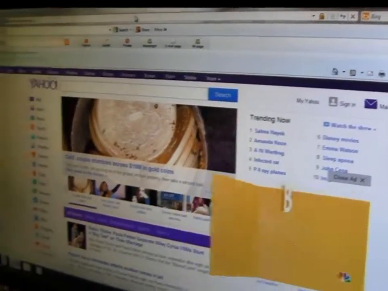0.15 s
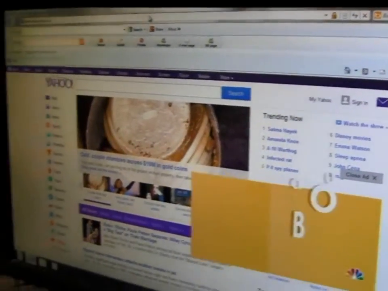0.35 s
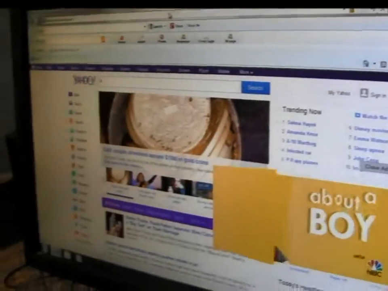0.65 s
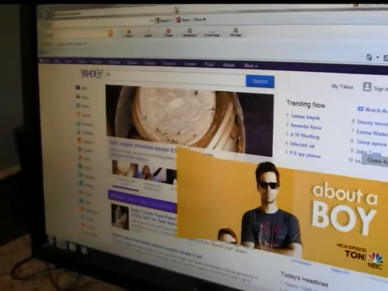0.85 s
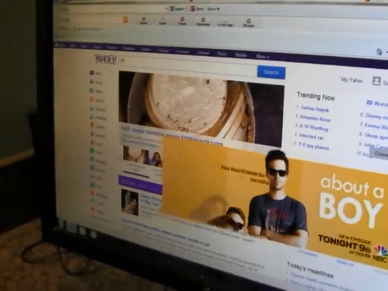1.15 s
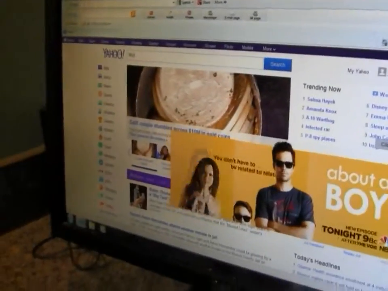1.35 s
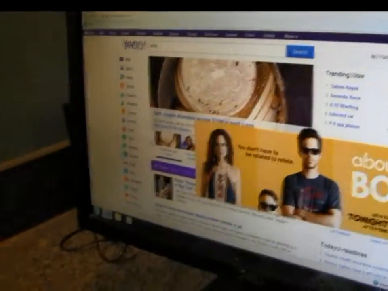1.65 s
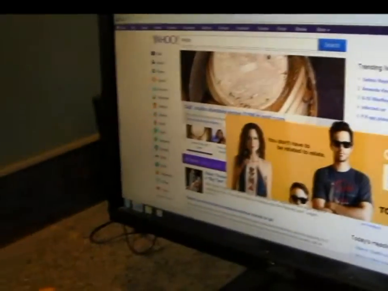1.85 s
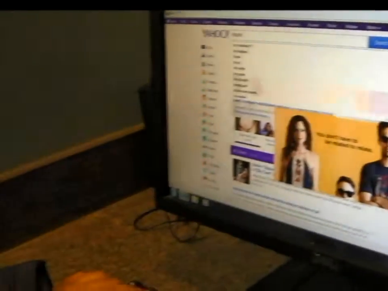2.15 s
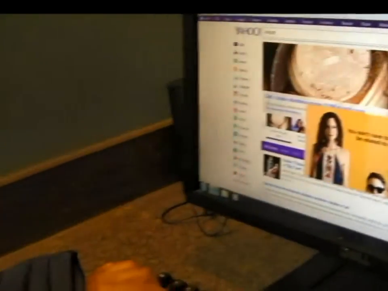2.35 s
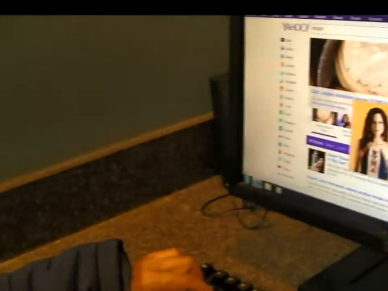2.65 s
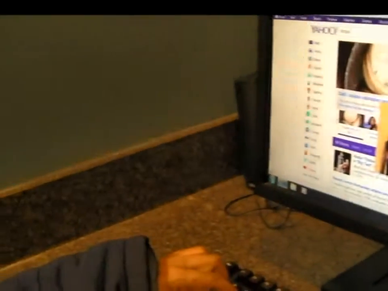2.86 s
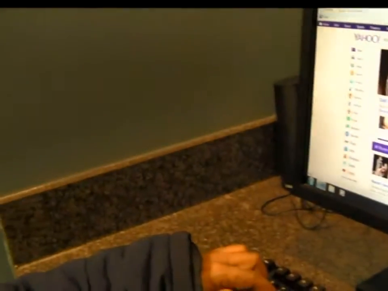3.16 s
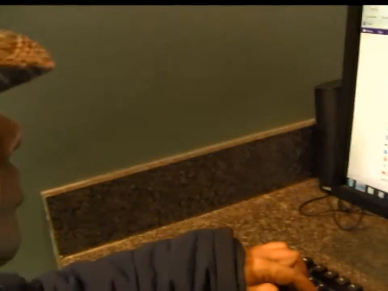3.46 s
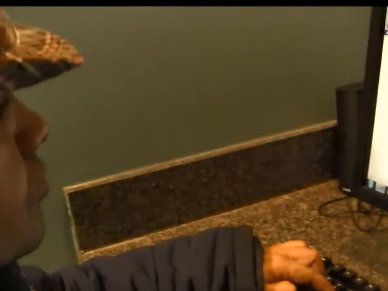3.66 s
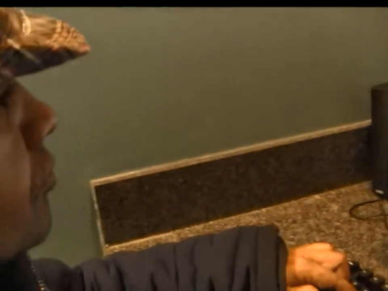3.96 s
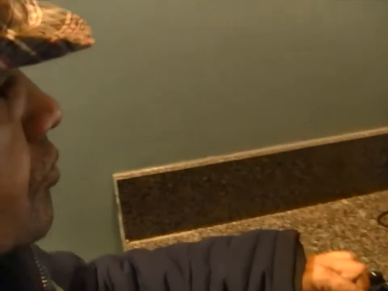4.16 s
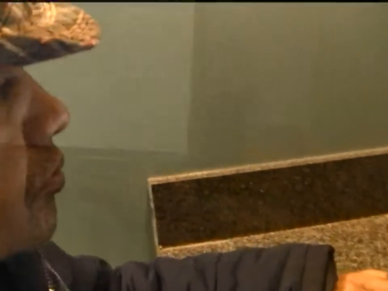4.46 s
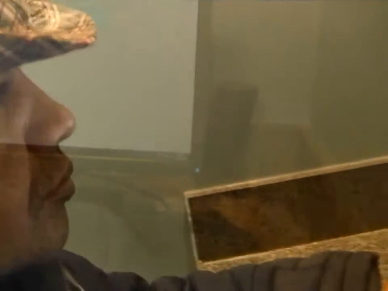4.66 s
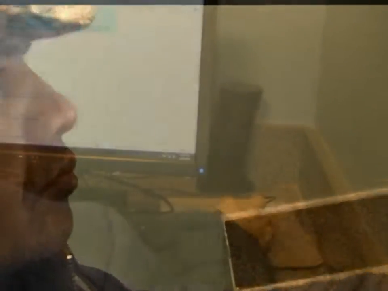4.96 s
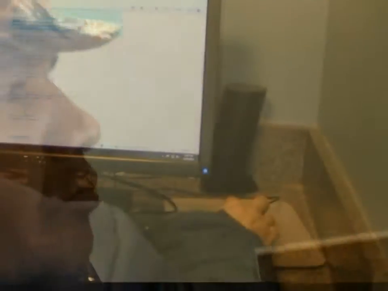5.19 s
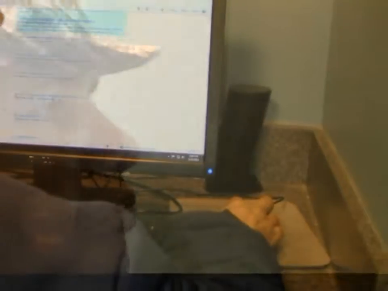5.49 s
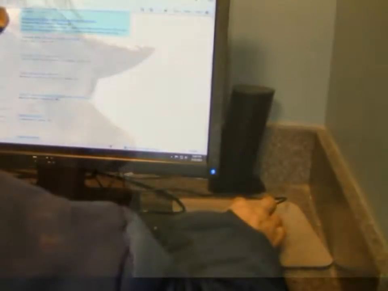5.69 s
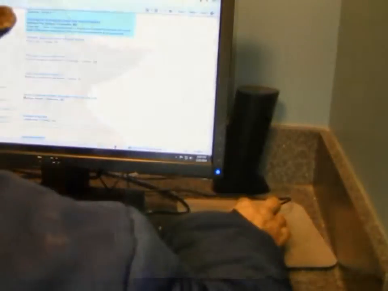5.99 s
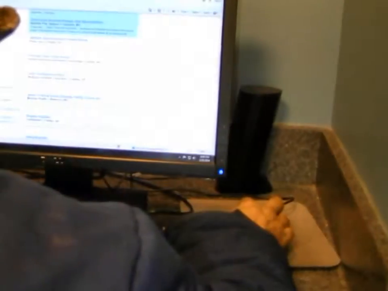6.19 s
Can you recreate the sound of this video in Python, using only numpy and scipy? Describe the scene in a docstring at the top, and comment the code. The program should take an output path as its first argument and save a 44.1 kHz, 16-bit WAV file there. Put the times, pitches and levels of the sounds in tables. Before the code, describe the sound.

Fingers clatter on computer keys in a small humming room, stop, strike again briefly, then cloth brushes the desk and a mouse clicks.

```python
"""Typing on a stone desk

Fingers type in short bursts on a plastic keyboard, close to a stereo camera. Each key contact is a
slide, a blow and a rattle of tiny ticks that ring cap, case and stem; some set off a fizzing wire or
a desk boom. A mouse clicks dry on the left. A sleeve brushes the desk as shaped cloth noise. Fans
hum low as wavering tones in patchy air noise; the typing alone gets sparse echoes of a small room."""
import sys
import numpy as np
from scipy import signal
from scipy.fft import rfft, irfft
from scipy.io import wavfile
from scipy.ndimage import uniform_filter1d

SR = 44100
rng = np.random.default_rng(int(sys.argv[2]) if len(sys.argv) > 2 else 0)


def pcm_store(signal):
    """Save signal as 16-bit PCM."""
    levels = np.round(np.clip(np.atleast_2d(signal), -1, 1) * 32767)
    wavfile.write(sys.argv[1], SR, levels.astype(np.int16).T)


N = 279153  # length in samples


def amp(db):
    """Turns decibels into an amplitude factor."""
    return 10 ** (np.asarray(db) / 20)


def evened(x):
    """Scales a signal to rms 1."""
    return x / np.sqrt(np.mean(np.abs(x) ** 2) + 1e-20)


def read(points, hz):
    """Reads a curve of (hz, value) points, straight over log frequency."""
    f, value = np.transpose(points)
    return np.interp(np.log(hz + 1), np.log(f + 1), value)


def grid(size):
    """Frame times and bin frequencies of a short-time spectrum."""
    times = np.arange(4 * N // size + 5) * size / 4 / SR
    return times, np.fft.rfftfreq(size, 1 / SR)[:, None]


def noise(gain, likeness, size):
    """Two partly alike channels of noise under a bins x frames gain; gain 1 is rms 1 over all bins."""
    a, b, c, d = rng.standard_normal((gain.shape[1], gain.shape[0], 4)).T
    same = np.clip(read(likeness, grid(size)[1]), -1, 1)
    left = a + 1j * b
    right = same * left + np.sqrt(1 - same ** 2) * (c + 1j * d)
    spectrum = np.array([left, right]) * gain
    return signal.istft(spectrum, nperseg=size, noverlap=3 * size // 4)[1][:, :N] / np.sqrt(size / 3)


def band_gain(shape_db, hz, lo_hz, hi_hz):
    """Scales a spectrum so that the band lo to hi has rms 1."""
    gain = amp(shape_db)
    in_band = (hz > lo_hz) * (hz < hi_hz)
    return gain / np.sqrt(np.mean(gain ** 2 * in_band, axis=0))


# fan and mains tones: pitch_hz, width_hz, level_db (wavering part, relative to the room level)
FAN_TONES = [(62.7, 28, -20.5), (124.6, 1.1, -13), (186.7, 8.8, -15.5), (223.8, 26, -6), (266.5, 14, -10),
             (537.7, 9.7, -12.5), (642, 8.3, -18)]


def hum():
    """Fan and mains lines: tones that waver in level and phase, partly steady."""
    hz, out = np.fft.rfftfreq(N, 1 / SR), 0
    for pitch_hz, width_hz, db in FAN_TONES:
        a, b = rng.standard_normal((len(hz), 2)).T
        resonance = 1 + (2 * (hz - pitch_hz) / width_hz) ** 2
        waver = irfft((a + 1j * b) / resonance, N)
        steady = np.sqrt(2) * np.sin(2 * np.pi * (pitch_hz * np.arange(N) / SR + rng.random()))
        out = out + amp(db) * (evened(waver) + 0.47 * steady)
    return out


# room noise drift: time_s, level_db, upper_edge_level_db, bass_gain_db (below BASS_HZ)
ROOM_DRIFT = [(0.0, -57.5, -70, -4), (1.02, -58.5, -67, 1.5), (1.46, -55.5, -72.5, -0.5),
              (1.849, -55, -64, -5), (2.43, -54.5, -74.5, 1.5), (2.751, -55, -71, 2.5), (3.0, -58, -88, 1),
              (3.55, -57.5, -83, -3), (3.7, -56.5, -76, 2), (4.34, -55, -69.5, 3), (4.87, -59.5, -62, 1),
              (5.55, -64, -85.5, -4), (5.9, -61.5, -78.5, -4), (6.33, -57.5, -71.5, -7.5)]
# tone of the air noise: pitch_hz, density_db (per Hz)
AIR_TONE = [(12, -54.5), (20, -25.5), (59, -25.5), (87, -26.5), (108, -11.5), (262, -2), (386, -5),
            (523, -5), (570, -11.5), (692, -8.5), (1140, -25.5), (1510, -30.5), (3500, -83), (4550, -101),
            (7700, -120)]
# left-right likeness of the air noise: pitch_hz, likeness (1 = identical)
AIR_LIKENESS = [(60, 0.93), (130, 0.87), (290, 0.54), (640, 0.25), (1400, 0.1123), (4000, 0.17)]
BASS_HZ = 150


def room():
    """Fan noise in drifting patches under the hum; its upper edge and its bass come and go."""
    time_s, level_db, edge_db, bass_db = np.transpose(ROOM_DRIFT)
    t, hz = grid(2048)
    low = band_gain(read(AIR_TONE, hz), hz, 100, 700) * amp(np.interp(t, time_s, level_db))
    edge_shape_db = -11.0 * np.log2(hz / 1000 + 1e-3) ** 2 - 3.4 * hz / 1000
    edge = band_gain(edge_shape_db, hz, 650, 2700) * amp(np.interp(t, time_s, edge_db))
    low_share = 1 / (1 + (hz / 850) ** 8)

    patches = rng.standard_normal((len(t), len(hz))).T
    patches = uniform_filter1d(patches, size=5, axis=0)
    patches = evened(uniform_filter1d(patches, size=8, axis=1))
    patchy_db = 2.4 * low_share + 3.3 * (1 - low_share)
    gain = np.sqrt(low_share * low ** 2 + (1 - low_share) * edge ** 2)
    air = noise(gain * amp(patchy_db * patches), AIR_LIKENESS, 2048)

    now = np.arange(N) / SR
    both = air + hum() * amp(np.interp(now, time_s, level_db))
    bass = signal.sosfiltfilt(signal.butter(3, BASS_HZ, fs=SR, output="sos"), both)
    return both + bass * (amp(np.interp(now, time_s, bass_db)) - 1)


# sleeve strokes: full_speed_from_s, hold_s, brush_db, rise_db_per_s, fall_db_per_s,
# treble_tilt_db_per_octave (well above 3 kHz), rumble_db
STROKES = [(.44, 0.052, -67, 497, 402, -20.5, -75), (2.741, 0.083, -54, 119.5, 204, -8, -60.5),
           (4.82, 0.036, -76.5, 73, 195, 2, -62.5), (4.938, .09, -45.5, 261, 90, 2.5, -56.5),
           (5.09, .1, -47, 90.5, 135.5, 4, -55), (5.108, 0.028, -43.5, 1195, 644, -4.5, -41),
           (5.36, 0.11, -72, 200.5, 256, -19.5, -68.5)]
# cloth hiss before the tilt: pitch_hz, density_db (per Hz)
CLOTH_TONE = [(410, -21), (700, -2.5), (872, -9), (1410, 0), (1630, -1.5), (1760, 3), (3450, -4.5),
              (5080, -4), (14100, -20), (15500, -23.5)]
# desk rumble under the sleeve: pitch_hz, density_db (per Hz)
RUMBLE_TONE = [(40, -37.5), (100, 1), (250, 14.5), (500, 8.5), (1000, 3.5), (1600, -17.5), (3000, -46)]
# left-right likeness of the sleeve: pitch_hz, likeness (1 = identical)
SLEEVE_LIKENESS = [(60, 0.94), (240, 0.85), (950, 0.79), (3770, 0.53), (15000, 0.041)]
DULLING = 0.55  # tilt lost per dB below full speed (dB/octave)
RUMBLE_FOLLOWS = 0.34  # share of the brush's rise and fall, in dB, that the rumble makes


def sleeve():
    """Cloth hiss, brighter in a fast stroke, flickering with the weave, over a rumble in the desk."""
    t, hz = grid(256)
    slow_t, low_hz = grid(512)
    weave = rng.standard_normal((len(t), len(hz))).T
    overall = evened(uniform_filter1d(rng.standard_normal(len(t)), size=5))
    by_band = evened(uniform_filter1d(weave, size=9, axis=0))
    flicker_db = 1.2 * overall + 0.84 * by_band

    brush_power = rumble_power = 0
    for s, hold, brush_db, rise, fall, tilt_db, rumble_db in STROKES:
        below_db = rise * np.maximum(s - t, 0) + fall * np.maximum(t - s - hold, 0)
        slope_db = np.clip(tilt_db - DULLING * below_db, -40, 10) * np.log2(1 + hz / 3000)
        cloth = band_gain(read(CLOTH_TONE, hz) + slope_db, hz, 1500, 6000)
        brush_power = brush_power + (cloth * amp(brush_db - below_db)) ** 2
        slow_below_db = np.interp(slow_t, t, below_db)
        rumble_power = rumble_power + amp(rumble_db - RUMBLE_FOLLOWS * slow_below_db) ** 2

    brush = np.sqrt(brush_power) * amp(flicker_db)
    rumble = band_gain(read(RUMBLE_TONE, low_hz), low_hz, 100, 1200) * np.sqrt(rumble_power)
    both = noise(brush, SLEEVE_LIKENESS, 256) + noise(rumble, SLEEVE_LIKENESS, 512)
    return both * amp([[-.8], [.8]])  # a little to the right


# heavy blows that boom in the desk top: start_s, level_db
DESK_BLOWS = [(0.688, -45.5), (1.182, -58), (1.547, -49), (3.246, -37.5), (4.43, -50.5), (5.123, -36.5)]
# desk top modes: pitch_hz, level_db (relative to the blow, before the swell), t60_s
DESK_MODES = [(63.5, -5, .2), (129, 1, 0.29)]
DESK_SWELL_S = 0.061  # time constant


def thumps():
    """Low desk modes that swell over tens of ms and die."""
    t, out = np.arange(N) / SR, 0
    for s, db in DESK_BLOWS:
        age = np.maximum(t - s, 0)
        modes = 0
        for pitch_hz, mode_db, t60 in DESK_MODES:
            modes = modes + amp(mode_db - 60 * age / t60) * np.sin(2 * np.pi * pitch_hz * age)
        out = out + amp(db) * (1 - np.exp(-age / DESK_SWELL_S)) * modes
    return out


# decay of the room echo: pitch_hz, t60_s
WALL_DECAY = [(250, 0.23), (1000, 0.18), (4000, 0.17), (12000, .15)]
WALLS_DB = -4.5


def walls(x):
    """Sparse echoes of random sign, each band dying at its own speed."""
    signs = rng.choice([-1., 1.], (2, SR // 2))
    taps = signs * (rng.random((2, SR // 2)) < .06)
    taps[:, :200] = 0  # a gap before the first echo
    taps[1] = 0.49 * taps[0] + 0.76 * taps[1]  # close microphones share much of the echo
    hz, t, z = signal.stft(taps, SR, nperseg=256)
    decay = amp(-60 * t / read(WALL_DECAY, hz)[:, None])
    tail = signal.istft(z * decay, SR, nperseg=256)[1]
    tail = tail / np.linalg.norm(tail[0])
    return amp(WALLS_DB) * signal.fftconvolve(x.mean(0)[None], tail, axes=1)[:, :N]


def ring(modes, centre_hz):
    """Causal response of well damped plastic modes whose powers add; those near a centre sound most."""
    f = np.fft.fftfreq(2048, 1 / SR)
    hz, width, db = np.transpose(modes)[:, :, None]
    width = np.maximum(width, .22 * hz)  # keeps every mode well damped
    luck_db = 1.5 * rng.standard_normal((len(modes), 1))
    near_db = -12 * abs(np.log2(hz / centre_hz))
    resonance = 1 + ((f ** 2 - hz ** 2) / (width * abs(f) + 1)) ** 2
    peaks = amp(db + luck_db + near_db) / resonance
    peaks = peaks / (1 + (f / (1.6 * hz.max())) ** 6)  # a soft contact cannot drive far above its modes
    log_gain = np.log((peaks ** 2).sum(0) + 1e-10) / 2
    minimum_phase = -signal.hilbert(log_gain).imag
    return np.fft.ifft(np.exp(log_gain + 1j * minimum_phase)).real[:1024]


# what the case, keycap, stem and spring ring with, each: pitch_hz, width_hz (ring may widen it), level_db
CASE_MODES = [(396, 67, 3), (529.5, 67, 2.5), (660, 370, 3), (924, 270, -7.5), (1138, 560, 5),
              (1510, 320, 3.5)]
CAP_MODES = [(2090, 770, 1.5), (2702, 170, -11), (2920, 1600, 1), (3640, 680, 0.5), (4020, 460, -3.5)]
STEM_MODES = [(5170, 3700, -10.5), (6060, 570, -9), (6850, 660, -6)]
SPRING_MODES = [(9590, 2000, 3.5), (10900, 5000, -20), (13600, 2000, -14)]
LEAD_S = .012  # time kept free before a blow


def contact(cap_db, case_db, stem_db, spring_db, cap_hz, case_hz, t60, rise_s, spring_hz=10000):
    """The part slides for the rise time, lands with a blow about as long, then rattles in small ticks."""
    t = np.arange(8192) / SR - LEAD_S
    a, b, size_db = rng.standard_normal((len(t), 3)).T
    slide = np.clip(1 + t / rise_s, 0, 1) ** 2
    blow = np.exp(-abs(t) / (0.62 * rise_s))
    rattle = 0.52 * amp(-60 * np.maximum(t, 0) / max(t60, .01))
    shape = amp(size_db) * slide * (blow + rattle)
    # peak level, modes, strongest pitch, left-right likeness
    parts = [(cap_db, CAP_MODES, cap_hz, .85), (case_db, CASE_MODES, case_hz, .97),
             (stem_db, STEM_MODES, 6500, .55), (spring_db, SPRING_MODES, spring_hz, .4)]
    sound = 0
    for k, (db, modes, centre_hz, same) in enumerate(parts):
        pair = [a, same * a + np.sqrt(1 - same ** 2) * b]
        ticks = np.roll(pair, 999 * k, axis=1) * shape  # each part gets its own ticks
        burst = signal.fftconvolve(ticks, ring(modes, centre_hz)[None], axes=1)
        sound = sound + amp(db) * burst / abs(burst).max()
    return sound


def clicks(table, rise_s):
    """Every contact of a table as (time, sound); the spring stays quiet."""
    return [(s, contact(cap, case, stem, -np.inf, *rest, rise_s)) for s, cap, case, stem, *rest in table]


def place(timed_sounds, pan_db):
    """Sums (time, sound) pairs, each at its place between the microphones; positive pan is left."""
    out = np.zeros((2, N + SR))
    for s, sound in timed_sounds:
        at = round((s - LEAD_S) * SR)
        out[:, at:at + sound.shape[1]] += sound * amp([[pan_db(s) / 2], [-pan_db(s) / 2]])
    return out[:, :N]


# mouse clicks and ticks: start_s, clack_peak_db, thock_peak_db, tick_peak_db,
# strongest_clack_hz, strongest_thock_hz, rattle_t60_s
MOUSE_CLICKS = [(5.353, -61, -51, -86, 2460, 1260, 0.026), (5.428, -57.5, -39.5, -90, 2050, 920, 0.059),
                (5.705, -46.5, -30.5, -44.5, 2500, 866, 0.035), (6.052, -79, -54, -67, 2100, 726, .2),
                (6.294, -74.5, -59.5, -57.5, 4120, 744, 0.26)]
MOUSE_RISE_S, MOUSE_PAN_DB = 0.0011, 11


def mouse():
    """Small dry contacts on the left, with a shorter slide than the keys and the same plastic modes."""
    return place(clicks(MOUSE_CLICKS, MOUSE_RISE_S), lambda s: MOUSE_PAN_DB)


KEY_RISE_S = 0.0046  # slide before the blow
# fizz of the wire under a long key: start_s, fizz_peak_db, strongest_hz
WIRE_FIZZES = [(0.683, -47.5, 13600), (0.7099, -49, 13600), (1.1805, -62, 13600), (2.0078, -61, 10000),
               (3.2379, -50.5, 10500), (4.4195, -35.5, 9300), (4.4417, -43.5, 9300), (6.293, -65, 13600)]
WIRE_T60_S = 0.048


def wires():
    """Contacts in which only the spring steel sounds."""
    fizzes = []
    for s, db, hz in WIRE_FIZZES:
        cap_hz, case_hz = CAP_MODES[0][0], CASE_MODES[0][0]  # both silent here
        fizz = contact(-np.inf, -np.inf, -np.inf, db, cap_hz, case_hz, WIRE_T60_S, KEY_RISE_S, hz)
        fizzes.append((s, fizz))
    return fizzes


# key contacts: start_s, keycap_clack_peak_db, case_thock_peak_db, stem_tick_peak_db,
# strongest_clack_hz, strongest_thock_hz, rattle_t60_s
KEY_CONTACTS = [(0.2217, -47.5, -41, -56, 1940, 540, 0.05), (0.4931, -35, -34, -44.5, 3430, 1000, 0.036),
                (0.684, -29.5, -30.5, -34, 2050, 1570, 0.06), (0.6957, -27, -39, -32, 2870, 1290, 0.07),
                (0.7099, -35.5, -35, -38.5, 1900, 660, 0.24), (0.8493, -36, -35, -40, 1920, 644, 0.11),
                (0.9353, -29.5, -26.5, -36.5, 3020, 1070, 0.018),
                (0.9662, -39.5, -35.5, -58, 2040, 1030, 0.015), (1.111, -73.5, -47, -92, 2220, 977, .074),
                (1.1808, -25, -32, -32.5, 3100, 600, 0.17), (1.21, -46, -40, -59, 2670, 514, 0.034),
                (1.297, -48.5, -58, -77, 2030, 506, 0.05), (1.3148, -51, -48, -81, 3070, 512, 0.039),
                (1.3417, -81, -58.5, -63, 3450, 533, .071), (1.5459, -31.5, -32, -31.5, 3670, 715, .17),
                (1.6419, -41.5, -56, -55, 1980, 546, .064), (1.658, -38, -36.5, -47.5, 3300, 640, 0.068),
                (1.752, -31, -37, -38.5, 3730, 675, 0.1), (1.8577, -46, -77, -56, 2090, 514, 0.025),
                (1.8779, -33.5, -41.5, -45.5, 3600, 566, 0.056),
                (1.9665, -29.5, -25, -39, 3070, 1000, 0.022), (2.0078, -38, -42, -53, 2030, 1460, 0.026),
                (2.1435, -36.5, -46, -51, 3200, 1200, 0.078), (2.1614, -45.5, -38.5, -69, 2340, 1050, 0.11),
                (2.1775, -39, -33.5, -44.5, 2880, 1040, 0.027),
                (2.2343, -50.5, -45.5, -63.5, 2200, 656, 0.079),
                (3.2185, -34, -29.5, -53, 2020, 1410, 0.12), (3.2381, -31, -30.5, -41.5, 3000, 1200, 0.095),
                (4.3277, -40.5, -38, -64, 2254, 1180, .24), (4.4202, -29.5, -26.5, -37, 2010, 1040, 0.017),
                (4.4292, -63, -29.5, -38, 2240, 980, .17), (4.4437, -40, -37.5, -47, 1890, 953, 0.14),
                (4.5102, -54.5, -52.5, -62, 2170, 600, 0.5), (4.846, -73, -41, -64, 2150, 520, 0.11),
                (5.1852, -29, -29, -36.5, 3400, 1240, 0.061)]
KEYS_PAN_DB, TURN_DB_PER_S = 2, -0.84  # the keyboard drifts right as the camera turns


def typing():
    """Key contacts ring cap, case and stem, with the fizzing wires among them."""
    sounds = clicks(KEY_CONTACTS, KEY_RISE_S) + wires()
    return place(sounds, lambda s: KEYS_PAN_DB + TURN_DB_PER_S * s)


def scene():
    """Lays the typing and its echo, the mouse and the desk sounds over the room."""
    keys = typing()
    return keys + walls(keys) + mouse() + thumps() + sleeve() + room()


# noise suppressor threshold: pitch_hz, threshold_db (per bin)
SUPPRESSOR_THRESHOLD = [(600, -110), (1500, -82.5), (4000, -87.5), (9000, -92), (11000, -77), (14000, -83)]


def suppress(x):
    """The camera lowers every band under its threshold, more the weaker it is, closing slowly."""
    hz, _, z = signal.stft(x, SR, nperseg=256, noverlap=192)
    power = uniform_filter1d((abs(z) ** 2).mean(0), size=9, axis=0)
    power = uniform_filter1d(power, size=5, axis=1)
    level_db = 10 * np.log10(abs(power) + 1e-16)
    under_db = np.clip(read(SUPPRESSOR_THRESHOLD, hz)[:, None] - level_db, 0, 28)
    closing = np.arange(z.shape[2]) * .5  # the shortfall may grow by 0.5 dB a frame
    under_db = np.minimum.accumulate(under_db - closing, axis=1) + closing
    lowered = z * amp(-.55 * under_db)
    return signal.istft(lowered, SR, nperseg=256, noverlap=192)[1][:, :N]


# microphone balance: pitch_hz, left_minus_right_db
MIC_BALANCE = [(100, -1.47), (500, 0.5), (4000, -0.5), (8000, -6.5), (15000, 0)]
HISS_DB, EDGE_HZ = -92, 15680  # hiss rms before the band limit; band limit


def record(dry):
    """The two microphones differ in tone; noise suppressor, a faint hiss, then the band limit."""
    lean_db = read(MIC_BALANCE, np.fft.rfftfreq(N, 1 / SR)) / 2
    miked = irfft(rfft(dry) * amp([lean_db, -lean_db]), N)
    hissy = suppress(miked) + amp(HISS_DB) * rng.standard_normal(dry.shape)
    low_pass = signal.firwin(1023, EDGE_HZ, window=("kaiser", 9), fs=SR)
    return signal.oaconvolve(hissy, low_pass[None], "same")


dry = scene()
out = record(dry)
pcm_store(out)
```